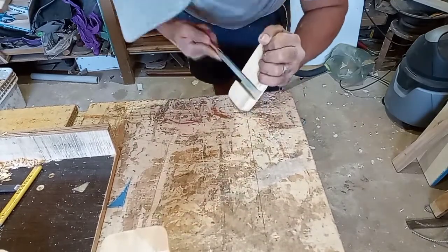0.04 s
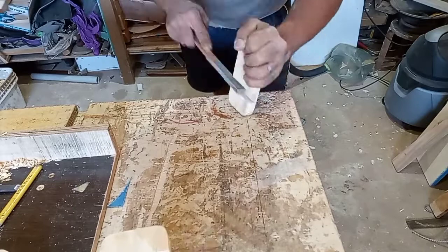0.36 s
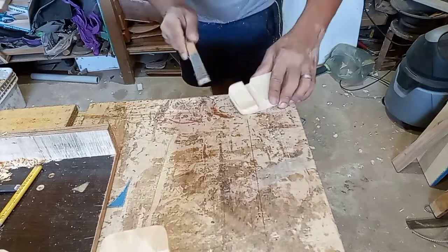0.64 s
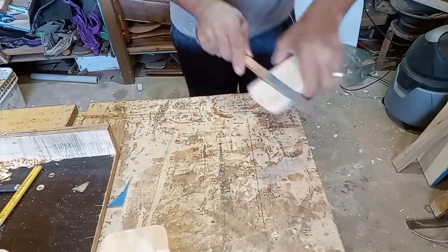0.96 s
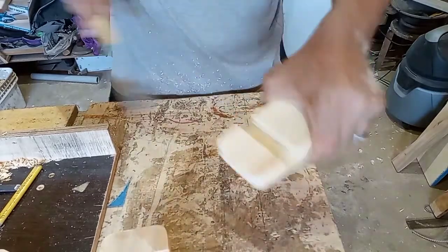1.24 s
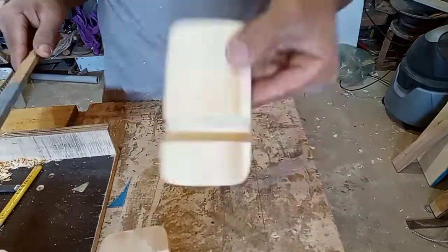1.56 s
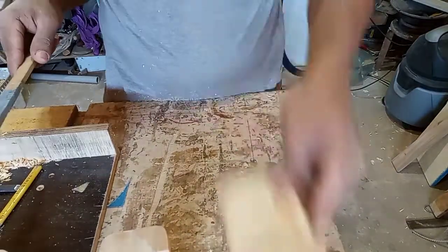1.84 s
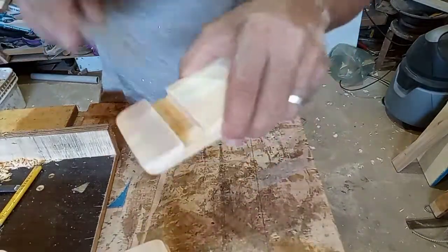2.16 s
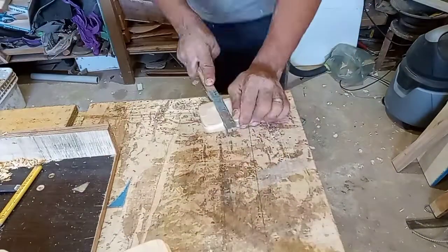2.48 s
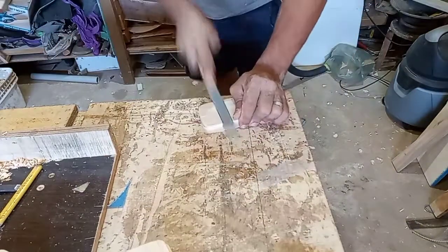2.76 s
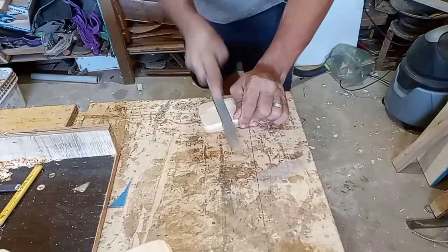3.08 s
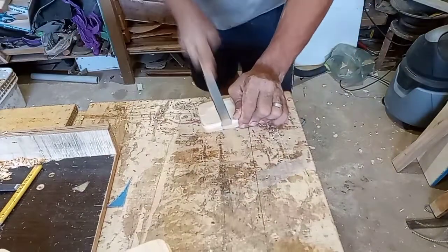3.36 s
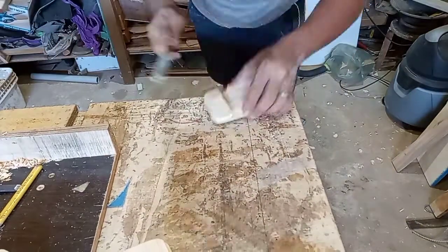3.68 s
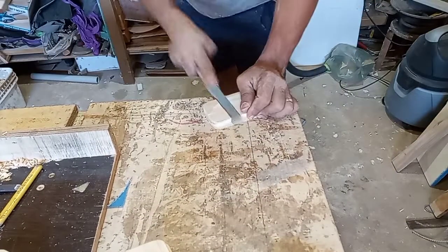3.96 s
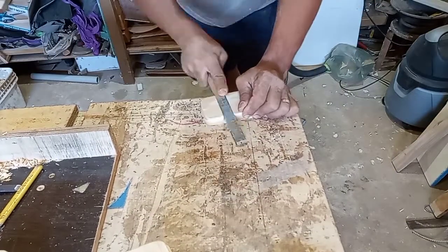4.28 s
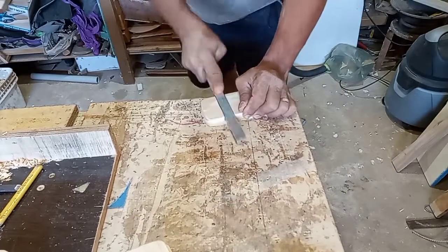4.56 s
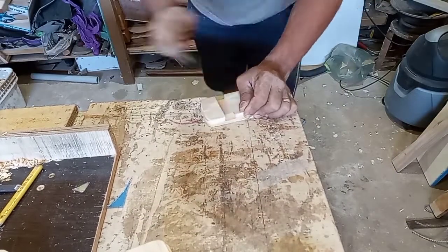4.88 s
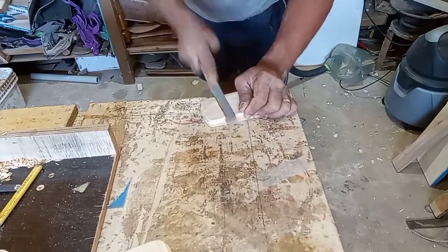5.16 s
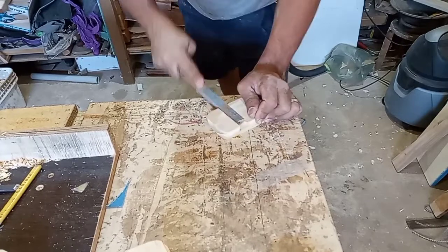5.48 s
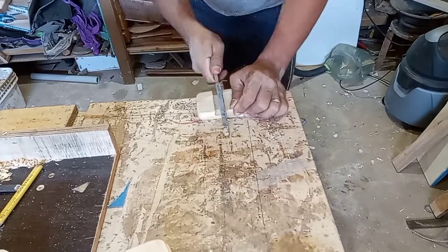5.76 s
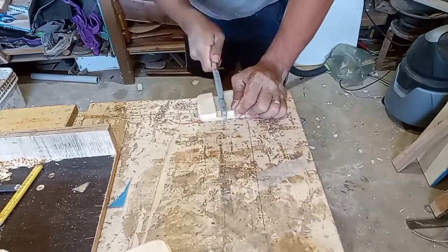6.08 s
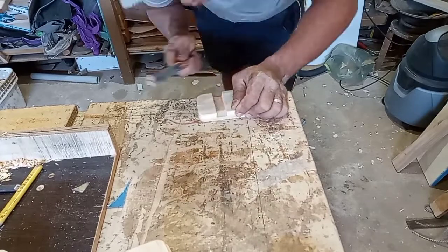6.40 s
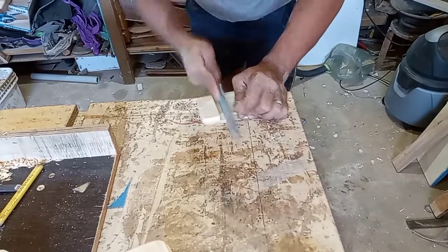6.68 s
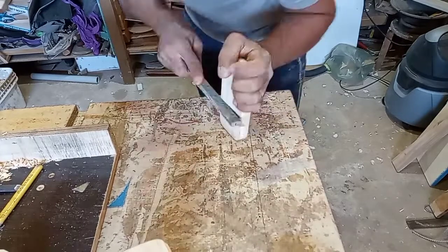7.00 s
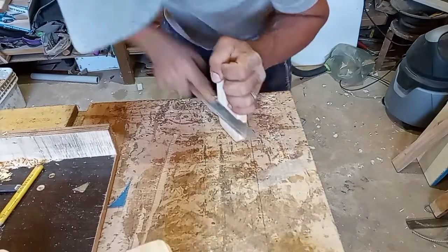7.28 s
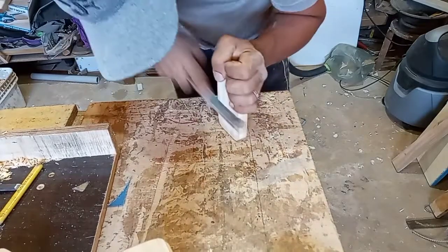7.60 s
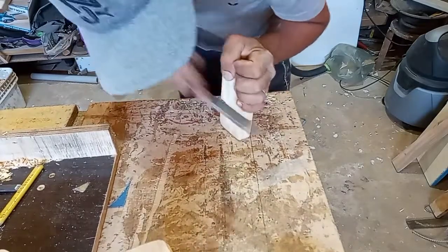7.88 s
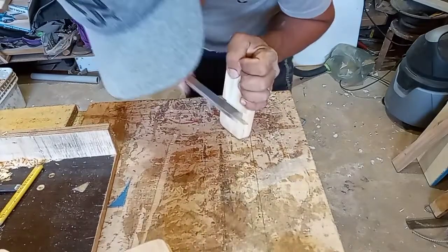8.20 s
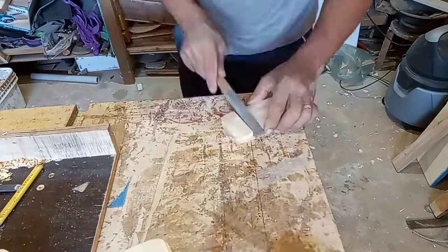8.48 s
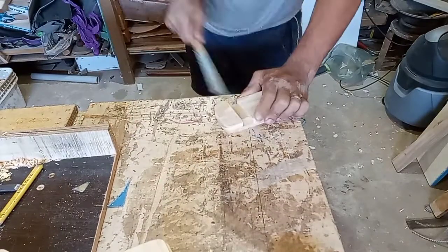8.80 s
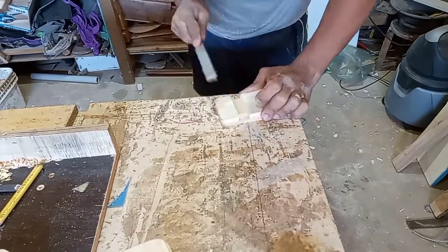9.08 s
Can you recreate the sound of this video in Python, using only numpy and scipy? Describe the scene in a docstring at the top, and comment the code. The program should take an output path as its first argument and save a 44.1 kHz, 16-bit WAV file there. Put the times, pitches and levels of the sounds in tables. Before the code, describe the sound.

A flat steel rasp scrapes a small wooden block in a small, dry workshop. A few short strokes give way to a pause with handling knocks on the bench. Then longer, chattering strokes follow, with brief screeches as the teeth catch and more knocks as the block is repositioned. The work sounds close, while distant animals howl, yap and chirp very faintly outside.

```python
"""A small, dry workshop: a flat steel rasp works a wooden block held on a bench.
Each stroke swells, holds and lifts off, chattering as the teeth bite and slip some 30-40 times a second.
Bites tear fibres; hard catches screech. Blade and block knock on the bench, and the block squeaks as it
shifts. Outside, distant animals howl, yap and chirp faintly. A noise suppressor shortens the tails."""
import sys
import numpy as np
from scipy import signal
from scipy.fft import rfft, irfft
from scipy.io import wavfile
from scipy.ndimage import uniform_filter1d

SR = 44100
rng = np.random.default_rng(int(sys.argv[2]) if len(sys.argv) > 2 else 0)


def to_wav(sig):
    """Store sig (one row per channel, or 1-D mono) as 16-bit WAV at the path in sys.argv[1].

    Samples outside -1..1 are clipped; the rate is SR.
    """
    pcm = np.clip(np.atleast_2d(sig), -1, 1) * 32767
    pcm = np.round(pcm).astype(np.int16)
    wavfile.write(sys.argv[1], SR, pcm.T)  # frames by channels


N = 407925
TIME_S = np.arange(N) / SR

# Blade pushes and pulls: start_s, end_s, attack_s, bite_rate_hz, rate_rise_hz, level_db, swell_db,
# middle_re_level_db, hiss_re_level_db
BLADE_STROKES = [(0.001, 0.078, 0.069, 18.4, 1, -27.5, -9.5, -7.5, -7),
                 (0.159, 0.181, 0.0034, 27, 2, -53.5, -6, 3, 4),
                 (0.208, 0.244, 0.0034, 53, -9, -38.5, 5, 0, -2.5),
                 (0.286, 0.471, 0.13, 29, 19, -30.5, -4.5, -10.5, -3),
                 (0.536, 0.573, 0.0017, 27.8, 6, -29.5, 18, -7.5, -1),
                 (0.727, 0.903, 0.09, 33.5, -24.5, -31.5, -9.5, -5, -1.5),
                 (0.903, 1.007, 0.003, 45, 0, -52.5, -4, -7, 1),
                 (0.999, 1.187, 0.003, 29, -1, -49, -1.5, -18.5, 6),
                 (1.203, 1.213, 0.0018, 42, 0, -34, -15, -28, 4.5),
                 (2.123, 2.132, 0.0014, 42, 1, -47.5, -7.5, 12, -7),
                 (2.292, 2.512, 0.16, 16.7, -10.5, -51, -17.5, -5, 0.5),
                 (2.515, 2.552, 0.0029, 34, 2, -42, 5, -1.5, -1),
                 (2.55, 3.503, 0.0047, 41, 13, -28, -2.5, -12, 0.5),
                 (3.556, 3.604, 0.007, 22, -7, -55, 2, 6.5, 0),
                 (3.63, 3.663, 0.0097, 11, 0.0, -46.5, -5, -4, -0.5),
                 (3.858, 4.269, 0.076, 33, 2.5, -33.5, -4.5, -9, 1.5),
                 (4.348, 4.872, 0.031, 45.5, 26, -32.5, 1.5, -9, 2.5),
                 (4.993, 5.028, 0.0077, 34, -9, -48.5, 5.5, 1, 1.5),
                 (5.065, 5.135, 0.0034, 33, 4, -47, 3, 0, -3),
                 (5.136, 5.209, 0.0037, 35, -4, -37, -9, -7.5, 2.5),
                 (5.202, 5.251, 0.004, 24, 2, -49.5, 2, 0.5, -9),
                 (5.254, 5.336, 0.03, 27.3, 4, -32.5, -10, -12, -2),
                 (5.337, 5.392, 0.0036, 36, 0, -45, 1, -2, -5),
                 (5.385, 5.499, 0.031, 28.6, 2, -35, -23, -9, -1),
                 (5.502, 5.592, 0.029, 21.7, 0, -32.5, -9, -9, -1.5),
                 (5.593, 5.785, 0.0034, 13.8, 1, -56.5, -18.5, 2.5, -3),
                 (5.788, 6.292, 0.0062, 36.6, 8.5, -32, 0.5, -8, -2),
                 (6.347, 6.428, 0.089, 22.4, -5, -52, 11, 0.5, 0.5),
                 (6.493, 6.718, 0.039, 33.3, 0, -31.5, 2, -9.5, -2.5),
                 (6.771, 6.87, 0.0027, 54, -14, -51.5, -28, 4.5, -2.5),
                 (7.009, 7.042, 0.003, 40, -4, -40.5, -13, -7, -7),
                 (7.043, 7.336, 0.012, 33.2, 6, -32, 0.5, -13, -6.5),
                 (7.389, 7.422, 0.017, 38, 0.5, -43.5, 2, -4.5, -1.5),
                 (7.462, 7.69, 0.029, 43, 15, -30.5, 7, -13, -2.5),
                 (7.758, 7.811, 0.014, 24, -4, -50, -4, 3.5, 1.5),
                 (7.835, 7.968, 0.0053, 39, 5, -31.5, 4.5, -10.5, -4),
                 (8.045, 8.085, 0.003, 31.6, -3.5, -46, -5, -4.5, -3),
                 (8.087, 8.257, 0.028, 35.6, -2, -32, 1.5, -10.5, -6.5),
                 (8.273, 8.391, 0.0027, 28, 4, -49, 8, -3.5, -4),
                 (8.396, 8.436, 0.004, 25, -11, -30.5, 1, -7.5, 2),
                 (8.44, 8.553, 0.006, 47, 0, -57, 3, 0, -3),
                 (8.551, 8.656, 0.004, 55, -3, -47, -17, 0.5, -1),
                 (8.651, 8.798, 0.026, 31.2, 13, -37.5, 9, -7.5, -4),
                 (8.886, 8.982, 0.015, 41, -21, -49.5, 5, 9.5, -2),
                 (8.969, 9.07, 0.056, 30.6, -7, -29.5, -11.5, -12.5, -8.5),
                 (9.168, 9.264, 0.0026, 30.4, 5, -36, 13, -9, -3.0)]
# Rasping spectrum: freq_hz, density_db
RASP_SPECTRUM = [(59, -70.5), (100, -39.5), (477, -19.5), (742, -11), (898, -10), (1040, -18), (1160, -8.5),
                 (1550, -6), (1920, -2.5), (3690, -8), (4280, -4), (4660, -4), (5510, -3.5), (12600, -10),
                 (15500, -13)]
# Blade digs into the grain and rings: start_s, end_s, level_re_stroke_db
GRAIN_DIGS = [(2.554, 2.95, -17), (7.034, 7.332, -16), (7.51, 7.69, -16), (7.846, 7.956, -3),
              (8.111, 8.244, -4.5)]
# Hard tooth catches: centre_s, level_db, pitch_hz, glide_oct_per_s
TOOTH_CATCHES = [(2.566, -27, 2108, -11), (2.597, -29, 4930, 78), (2.623, -26, 6630, -65),
                 (2.65, -25, 5200, 91.5), (2.677, -21.5, 5000, -95), (2.731, -20.5, 4880, -91.5),
                 (2.783, -23, 4930, -100), (2.883, -26, 5590, -30), (2.933, -28, 5470, -40),
                 (7.087, -24.5, 4120, 70.5), (7.202, -28.5, 5580, -7), (7.256, -25, 5500, 38.5),
                 (7.315, -29, 5470, 5), (7.497, -29, 2200, -21), (7.52, -28, 6220, 32.5),
                 (7.566, -26.5, 5800, 27), (7.607, -28.5, 5520, 38.5), (7.867, -28.5, 2890, 123),
                 (7.92, -27.5, 3600, 146), (8.15, -26, 2318, 21), (8.183, -31.5, 2000, -30.5),
                 (8.209, -34, 3830, 140)]
# Blade and block touch down, before the lifts in knocks(): time_s, level_db, middle_rel_db, top_rel_db
BENCH_KNOCKS = [(0.207, -24, -35, -2), (0.541, -11, -16, -8), (0.686, -42.5, 10, -6), (0.703, 1, -22, -43),
                (0.752, -25, -6, -16), (1.203, -22, -45, 1.5), (1.454, -49, -39, 5), (1.889, 3, -24, -26),
                (1.898, -9, -24, -7.5), (1.905, -23.5, 0.5, -22), (2.123, -32, -7, -18),
                (2.189, -29, -18, -6), (2.23, -29, -13, 3), (2.389, -15.5, -11.5, -42),
                (2.41, -18, -15, -21), (3.55, -28.5, -20, -1), (3.712, -35.5, -1, -26),
                (3.72, -10, -13.5, -20), (3.777, -16, -11.5, -33), (3.791, -15, -10, -26),
                (5.063, -14.5, -22, -14.5), (5.101, -25, -20, -4), (5.68, -24, -1, -7),
                (5.719, -18.5, -14, -17), (6.464, -25.5, -8.5, -30), (6.479, -10, -14.5, -15),
                (6.796, -17.5, -10, -25), (6.868, -33.5, -1, -33), (6.889, -10, -6, -59),
                (6.914, -23.5, 2.5, -41), (6.935, -22.5, -17, -15), (7.005, -2, -36, -23),
                (7.021, -19, -28, -19), (7.46, -2.5, -34, -29), (7.815, -17.5, -10.5, -29),
                (8.089, -7.5, -30, -12), (8.395, -24.5, -4, 6), (8.492, -22.5, -8, -11),
                (8.856, -14.5, -22, -18), (9.115, -21, -18.5, -22), (9.151, -14, -13.5, -28)]
# Knock spectrum: freq_hz, gain_db
KNOCK_SPECTRUM = [(60, -33), (250, -30.5), (500, -14.5), (900, -3), (1300, -4.5), (1950, -1), (3000, -4.5),
                  (4200, -2.5), (8000, -6), (15500, -12.5)]
# Blade, block and bench modes: freq_hz, level_db, t60_s
WORK_MODES = [(913, -47, .2), (1175, -51, .17), (2050, -49, .11), (2927, -50, .12), (3980, -52, .12),
              (4097, -51, .13), (4194, -46, .15), (4373, -50, .12), (5153, -51, .1), (5608, -51, .11),
              (5729, -53, .1), (6077, -50, .1), (6758, -49.5, .1)]
# Block shifts on the bench: centre_s, pitch_hz, level_db
BLOCK_SQUEAKS = [(.965, 1820, -50), (1.85, 1650, -78.5), (2.39, 1730, -58), (6.365, 1820, -61)]
# Far howls: start_s, end_s, start_pitch_hz, level_db
FAR_HOWLS = [(0.273, 0.549, 399, -65), (0.601, 1.348, 359.4, -48), (2.037, 2.303, 405, -61.5),
             (8.43, 8.653, 403, -61.5)]
# Nearer yaps: centre_s, pitch_hz, level_db
ANIMAL_YAPS = [(.42, 817, -49.5), (.62, 806, -53.5), (.85, 822, -56), (1.025, 813, -50), (1.22, 819, -51.5),
               (1.575, 804, -55.5), (1.85, 847, -57), (2.17, 788, -51.5), (1.96, 866, -55.5),
               (3.9, 684, -57.5), (4.33, 708, -53), (5.13, 659, -59.5), (5.24, 802, -61.5),
               (5.48, 690, -52.5), (5.63, 680, -55), (5.78, 767, -53.5), (5.87, 650, -62), (6.04, 676, -55),
               (6.14, 761, -49.5), (6.33, 692, -62), (6.48, 763, -47), (6.65, 662, -56.5), (6.98, 750, -57),
               (7.31, 668, -66), (7.84, 780, -52), (8.03, 740, -60.5), (8.37, 680, -53), (8.45, 810, -52.5),
               (8.53, 640, -55.5), (8.91, 747, -51.5)]
# Small birds: centre_s, pitch_hz, level_db
BIRD_CHIRPS = [(1.29, 1450, -78), (1.8, 1390, -74.5), (2.32, 1670, -61), (2.37, 1780, -62),
               (2.45, 1770, -64), (2.54, 1684, -53), (3.89, 1690, -54), (5.29, 1630, -52),
               (5.67, 1340, -64), (5.75, 1235, -60), (6.365, 1724, -62.5)]
# Partials of each voice: harmonic, gain_db
SQUEAK_PARTIALS = [(3, -2), (4, 3), (5, 3.5)]
HOWL_PARTIALS = [(1, 4.5), (2, -16.5)]
YAP_PARTIALS = [(1, 6.5), (2, -19.5)]
CHIRP_PARTIALS = [(1, -1), (2, 13.5), (3, -0.5), (4, -7.5), (5, -4)]
# Still workshop air: freq_hz, density_db
AIR_SPECTRUM = [(25, -8.5), (200, -21), (305, 0.5), (365, -8), (650, -3.5), (1500, -12.5), (4000, -13.5),
                (15500, -23.5)]


def rasping(room, other_room):
    """Each bite tears fibres; the wood groans just before the hiss. Reflections shift as the hands move."""
    lead_turns, trim_db = (0.11, 0.1, 0.044), (-1.38, -2, 0.5)  # middle, bite, hiss
    uneven_db, ring_band_hz = 1.33, (4500, 7800)
    gain, turns, swing_db, middle_db, hiss_db = stroke_controls()
    gain *= from_db(uneven_db * drift(rate_hz=60))
    grains = [grit(coloured(fibres(), RASP_SPECTRUM)) for _ in range(3)]
    chatter = [from_db(-swing_db * np.cos(2 * np.pi * (turns + lead))) for lead in lead_turns]
    digging = sum(from_db(db) * ((TIME_S > start_s) & (TIME_S < end_s)) for start_s, end_s, db in GRAIN_DIGS)
    ringing = digging * unit_rms(band(grains[0], ring_band_hz, "band", order=4))
    out = (catches() + ringing * chatter[1] * gain) / np.linalg.norm(room)
    layers = registers(*grains, order=4)
    for layer, colour_db, pulses, db in zip(layers, (middle_db, 0, hiss_db), chatter, trim_db):
        room_rms = np.std(signal.oaconvolve(layer, room)[:N])
        out += layer / room_rms * pulses * gain * from_db(colour_db + db)
    moved = np.clip(0.5 + 0.5 * drift(rate_hz=4), 0, 1)
    return (signal.oaconvolve(out * (1 - moved), room) + signal.oaconvolve(out * moved, other_room))[:N]


def stroke_controls():
    """Strokes start light, arch in pressure and brighten. At high bite rates the blade skims: less swing."""
    entry_db, arch_db, brighten_db = -17, 1.5, 3.5
    touch_s, lift_s = 0.00081, 0.0017
    chatter_db, skim_above_hz, skim_db_per_hz = 6, 28.3, 0.2482
    gain, turns, swing_db, middle_db, hiss_db = np.zeros((5, N))
    for start_s, end_s, attack_s, rate_hz, rise_hz, db, swell_db, woody_db, toothy_db in BLADE_STROKES:
        span = (TIME_S > start_s) & (TIME_S < end_s)
        t, length_s = TIME_S[span] - start_s, end_s - start_s
        along = t / length_s - 0.5
        pressure_db = db + swell_db * along - arch_db * (2 * along) ** 2
        pressure_db += entry_db * np.clip(1 - t / attack_s, 0, 1)
        contact = np.clip(t / touch_s, 0, 1) * np.clip((length_s - t) / lift_s, 0, 1)
        gain[span] += from_db(pressure_db) * contact
        bite_hz = rate_hz + rise_hz * along
        turns[span] = np.cumsum(bite_hz) / SR
        swing_db[span] = chatter_db - skim_db_per_hz * np.maximum(bite_hz - skim_above_hz, 0)
        middle_db[span], hiss_db[span] = woody_db, toothy_db + brighten_db * along
    return gain, turns, swing_db, middle_db, hiss_db


def fibres(snaps_per_s=9000, spread_db=2.5, rub_gain=0.46):
    """Wood fibres snap as tiny uneven clicks over smooth rubbing."""
    sizes = from_db(spread_db * np.minimum(rng.exponential(1, N), 4)) * rng.choice([-1, 1], N)
    snaps = sizes * (rng.random(N) < snaps_per_s / SR)
    return unit_rms(snaps) + rub_gain * rng.standard_normal(N)


def grit(x, depth_db=6, flicker_hz=150.1):
    """Each tear favours its own pitches: the upper half-octave bands trade energy."""
    edges_hz = 1400 * np.sqrt(2) ** np.arange(7)
    below = [signal.sosfiltfilt(signal.butter(3, hz, fs=SR, output="sos"), x) for hz in edges_hz]
    shares = np.array([from_db(depth_db * drift(flicker_hz)) for _ in edges_hz])
    shares /= np.sqrt(np.mean(shares ** 2, axis=0))
    return below[0] + np.sum(shares * np.diff([*below, x], axis=0), axis=0)


def catches(half_length_s=0.01, blur_hz=422):
    """Teeth drum across the grain: a rough tone, rising as the blade slips, falling as it is held back."""
    out, t = np.zeros(N), np.arange(-SR // 50, SR // 50) / SR
    for centre_s, db, hz, glide_oct_per_s in TOOTH_CATCHES:
        pitch_hz = np.clip(hz * 2 ** (glide_oct_per_s * t), 1500, 9000)
        pitch_hz += blur_hz * low_noise(len(t), cutoff_hz=900)
        tone = np.sqrt(2) * np.sin(2 * np.pi * np.cumsum(pitch_hz) / SR)
        at = int((centre_s + t[0]) * SR)
        out[at:at + len(t)] += from_db(db) * tone * np.exp(-(t / half_length_s) ** 2)
    return band(out, 1300, "high", order=4)


def knocks(room, lift_db=3.5, middle_lift_db=20, top_lift_db=17.5, skid_s=0.0037):
    """Soft contacts are woody, hard ones click; each skids briefly after landing."""
    clicks = np.zeros((3, N))
    for time_s, db, middle_db, top_db in BENCH_KNOCKS:
        levels_db = [db + middle_db + middle_lift_db, db, db + top_db + top_lift_db]
        clicks[:, int((time_s + 0.0015) * SR)] = from_db(levels_db)
    pole = np.exp(-1 / (skid_s * SR))
    skid_power = signal.lfilter([1 - pole], [1, -pole], clicks ** 2 + 1e-18)
    skids = np.sqrt(skid_power) * rng.standard_normal(N)
    middle, bite, top = registers(*(clicks + skids), order=2)
    return from_db(lift_db) * signal.oaconvolve(coloured(middle - bite + top, KNOCK_SPECTRUM), room)[:N]


def workshop(wet_db=-3, low_t60_s=0.27, high_t60_s=0.12, split_hz=420, build_s=0.00094):
    """Impulse response of a contact: direct click, ringing modes, dense reflections from close walls."""
    t = TIME_S[:SR // 2]
    noise = rng.standard_normal(len(t))
    low = band(noise, split_hz, "low", order=1)
    tail = low * from_db(-60 * t / low_t60_s) + (noise - low) * from_db(-60 * t / high_t60_s)
    tail *= 1 - np.exp(-t / build_s)
    response = from_db(wet_db) * tail / np.linalg.norm(tail)
    for hz, db, t60_s in WORK_MODES:
        response += from_db(db - 60 * t / t60_s) * np.cos(2 * np.pi * hz * t)
    response[0] += 1
    return response


def short_tones(events, partials, length_s, arch, waver, hoarse_db=3, hoarse_hz=45):
    """Squeaks, yaps or chirps: brief tones that arch in pitch, broken up by flutter."""
    out, along = np.zeros(N + SR), np.linspace(-1, 1, int(length_s * SR))
    envelope = np.cos(np.pi * along / 2) ** 2
    for centre_s, hz, db in events:
        at = max(int((centre_s - length_s / 2) * SR), 0)
        flutter = unit_rms(from_db(hoarse_db * low_noise(len(along), hoarse_hz)))
        tone = voice(hz * (1 - arch * along ** 2), partials, waver)
        out[at:at + len(along)] += from_db(db) * flutter * envelope * tone
    return out


def howls():
    """Far, nearly pure tones that climb ever more slowly and waver in level; the longest dips briefly."""
    attack_share, release_share, edge_db = 0.48, 0.11, -23
    first_second_climb_hz, fading_db = 121.4, 2.5
    dip_at_s, dip_half_s = 1.011, 0.0095
    out = np.zeros(N)
    for start_s, end_s, hz, db in FAR_HOWLS:
        span = (TIME_S > start_s) & (TIME_S < end_s)
        t = TIME_S[span] - start_s
        along = t / (end_s - start_s)
        held = np.minimum(np.minimum(along / attack_share, (1 - along) / release_share), 1)
        tone = voice(hz + first_second_climb_hz * t ** 0.75, HOWL_PARTIALS, waver=0.018)
        out[span] += from_db(db + edge_db * (1 - held)) * tone
    out *= from_db(fading_db * drift(rate_hz=22))
    dip = 1 - np.exp(-((TIME_S - dip_at_s) / dip_half_s) ** 2)
    return dip * echoes(out, wet_db=-16.5, t60_s=0.53)


def voice(pitch_hz, partials, waver):
    """Harmonic tone; waver is the rms pitch deviation as a fraction."""
    wobble = low_noise(len(pitch_hz), cutoff_hz=60)
    phase = 2 * np.pi * np.cumsum(pitch_hz * (1 + waver * wobble)) / SR
    return np.sqrt(2) * sum(from_db(db) * np.sin(harmonic * phase) for harmonic, db in partials)


def echoes(x, wet_db, t60_s):
    """Scattered echoes blur a sound on its way in."""
    t = TIME_S[:SR // 2]
    response = rng.standard_normal(len(t)) * from_db(-60 * t / t60_s)
    response *= from_db(wet_db) / np.linalg.norm(response)
    response[0] += 1
    return signal.oaconvolve(x, response / np.linalg.norm(response))[:N]


def still_air(level_db=-68):
    """Faint, steady room noise."""
    return from_db(level_db) * unit_rms(coloured(rng.standard_normal(N), AIR_SPECTRUM))


def from_db(db):
    return 10 ** (np.asarray(db) / 20)


def unit_rms(x):
    return x / np.sqrt(np.mean(x ** 2) + 1e-20)


def band(x, hz, kind, order=2):
    return signal.sosfilt(signal.butter(order, hz, kind, fs=SR, output="sos"), x + 1e-18)


def low_noise(samples, cutoff_hz):
    return unit_rms(band(rng.standard_normal(samples), cutoff_hz, "low"))


def drift(rate_hz):
    """Interpolated random curve, unit rms."""
    points = rng.standard_normal(int(rate_hz * N / SR) + 3)
    return unit_rms(np.interp(TIME_S * rate_hz, np.arange(len(points)), points))


def coloured(x, spectrum, taps=4096):
    """Minimum-phase filter following a spectrum."""
    hz, db = np.transpose(spectrum)
    grid_hz = np.maximum(np.fft.rfftfreq(taps, 1 / SR), 1)
    gain = from_db(np.interp(np.log(grid_hz), np.log(hz), db))
    cepstrum = irfft(np.log(gain))
    cepstrum[1:taps // 2] *= 2
    cepstrum[taps // 2 + 1:] = 0
    return signal.oaconvolve(x, irfft(np.exp(rfft(cepstrum))))[:len(x)]


def registers(middle, bite, hiss, order, edges_hz=(2635, 8520)):
    """Three ranges of a contact: woody middle, bite, hiss."""
    return [band(middle, edges_hz[0], "low", order),
            band(bite, edges_hz, "band", order),
            band(hiss, edges_hz[1], "high", order)]


def noise_suppressor(x, threshold_db=-84, depth_db=-8, above_hz=150):
    """Turns down faint content above the bass, so tails end early."""
    hz, _, spectra = signal.stft(x, SR, nperseg=512)
    power = uniform_filter1d(np.abs(spectra) ** 2, size=7, axis=0)
    faint = 1 / (1 + np.abs(power) / from_db(threshold_db) ** 2)
    gain = from_db(depth_db * faint * (hz > above_hz)[:, None])
    return signal.istft(spectra * gain, SR)[1][:N]


def scene():
    """Rasp, knocks and squeaks indoors, animals outside, still air; mono."""
    room, other_room = workshop(), workshop()
    work = rasping(room, other_room) + knocks(room)
    squeaks = short_tones(BLOCK_SQUEAKS, SQUEAK_PARTIALS, length_s=0.079, arch=0.0063, waver=0.0096)
    squeaks = echoes(squeaks, wet_db=2, t60_s=0.26)
    yaps = short_tones(ANIMAL_YAPS, YAP_PARTIALS, length_s=0.075, arch=0.13, waver=0.045)
    yaps = echoes(yaps, wet_db=2, t60_s=0.25)
    chirps = short_tones(BIRD_CHIRPS, CHIRP_PARTIALS, length_s=0.085, arch=0.04, waver=0.035)
    chirps = echoes(chirps, wet_db=5, t60_s=0.18)
    air = still_air()
    return (work + squeaks + howls() + yaps + chirps + air)[None]


def record(dry):
    """Noise suppression, peak rounding that spares the bass, steep low-pass."""
    knee, bass_edge_hz, cutoff_hz = 0.42, 500, 15650
    x = noise_suppressor(dry[0])[None]
    excess = x - x / (1 + (x / knee) ** 4) ** 0.25
    rounded = x - band(excess, bass_edge_hz, "high")
    return signal.sosfilt(signal.ellip(12, 0.1, 80, cutoff_hz, fs=SR, output="sos"), rounded)


dry = scene()
out = record(dry)
to_wav(out)
```